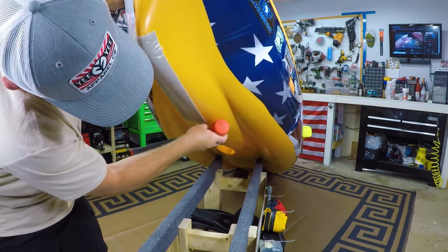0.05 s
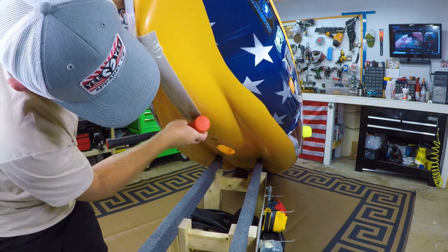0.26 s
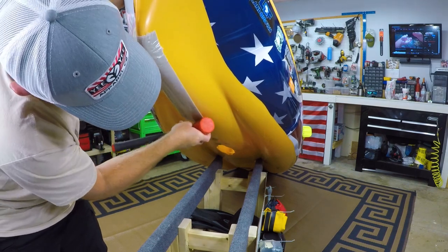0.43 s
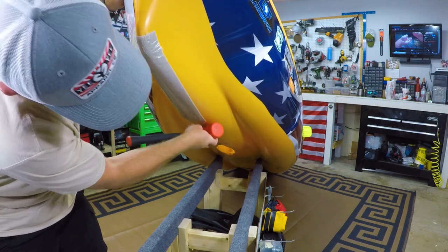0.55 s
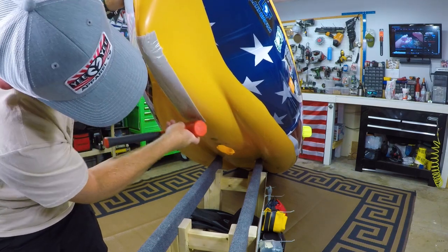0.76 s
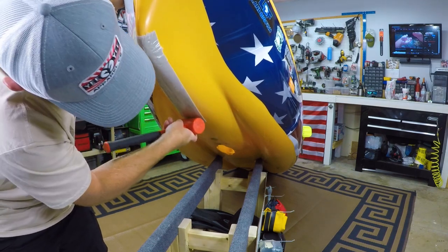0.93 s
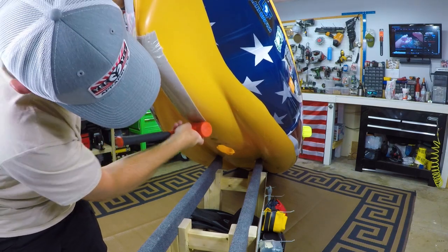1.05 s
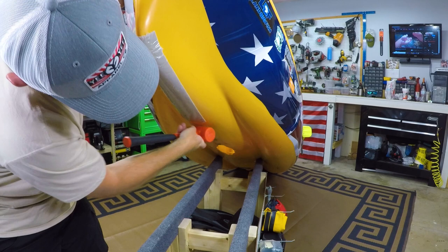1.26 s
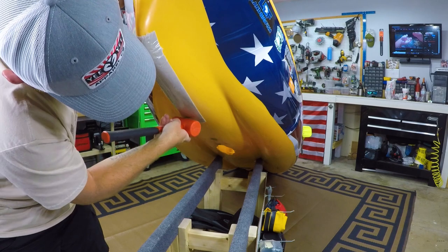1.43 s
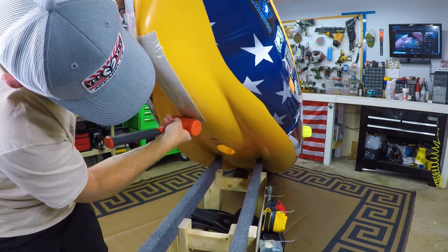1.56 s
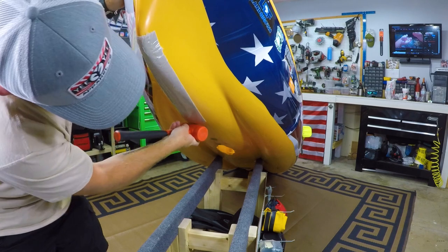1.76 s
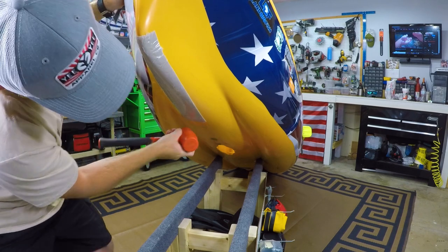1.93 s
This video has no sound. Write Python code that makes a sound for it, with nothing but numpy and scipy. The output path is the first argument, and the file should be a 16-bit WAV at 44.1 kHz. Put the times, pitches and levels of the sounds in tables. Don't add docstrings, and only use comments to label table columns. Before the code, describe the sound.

Mallet knocks on a hollow plastic kayak hull, six hits alternating firm blow and lighter tap, each booming briefly with a dull tail; faint scrapes and hand rubs between, in a garage, close small microphone.

```python
import sys
import numpy as np
from scipy import signal
from scipy.fft import rfft, irfft
from scipy.io import wavfile
from scipy.ndimage import uniform_filter1d

SR = 44100
rng = np.random.default_rng(int(sys.argv[2]) if len(sys.argv) > 2 else 0)


def pcm_store(signal):
    levels = np.round(np.clip(np.atleast_2d(signal), -1, 1) * 32767)
    wavfile.write(sys.argv[1], SR, levels.astype(np.int16).T)


def natural_amplitude(level_db):
    exponent = np.asarray(level_db, float) / 20
    return 10 ** exponent


N = 88200

# f/Hz, level/dB per Hz
HUM_SPECTRUM = [(15, 10), (25, 10.5), (112, 0.5), (237, -8), (451, 1.5), (606, -13), (1150, -15),
                (1510, -16.5), (15100, -28.5)]
# f/Hz, width/Hz, level/dB
HUM_BAND = (460, 67, -79)
# t/s, rise/s, fall/s, level/dB
SHIFTS = [
    (.42, 0.042, 0.075, -54),
    (.97, 0.062, 0.082, -48),
    (1.1, 0.041, 0.062, -50.5),
    (1.18, 0.038, 0.079, -60.5),
    (1.62, 0.028, 0.14, -47),
    (1.74, 0.028, 0.037, -47.5),
]
# f/Hz, level/dB per Hz
SHIFT_SPECTRUM = [(25, -46), (50, 7), (80, 0), (145, -2), (200, -4.5), (300, -7.5), (500, -16),
                  (900, -46.5)]
# t/s, rise/s, fall/s, level/dB
DRAGS = [
    (.25, 0.044, 0.093, -60.5),
    (.4, 0.027, 0.24, -58.5),
    (.93, 0.047, 0.17, -60.5),
    (1.03, 0.034, 0.19, -59.5),
    (1.59, 0.037, 0.13, -61.5),
    (1.68, 0.027, 0.14, -61),
    (1.77, 0.094, .2, -59),
]
# f/Hz, level/dB per Hz
DRAG_SPECTRUM = [(150, -28), (400, 6.5), (700, 0), (1200, -2.5), (2000, -5), (3200, -10.5), (4500, -21),
                 (7000, -25)]
# t/s, rise/s, fall/s, level/dB
RUBS = [
    (.224, 0.0067, 0.059, -59),
    (.42, 0.065, 0.11, -60.5),
    (.8, 0.015, 0.038, -64),
    (1.04, 0.018, 0.14, -65),
    (1.36, 0.0063, 0.023, -100),
    (1.44, 0.03, 0.047, -61.5),
    (1.67, 0.03, 0.058, -63.5),
    (1.785, 0.014, 0.13, -60.5),
    (1.88, 0.078, 0.11, -69.5),
]
# f/Hz, width/Hz, level/dB
RUB_BANDS = [(1850, 2630, 5.5), (3650, 3700, 1.5), (7600, 4000, -1.5), (10400, 2600, -41),
             (13100, 5200, -7.5)]
# t/s, rise/s, fall/s, level/dB
GRIPS = [
    (.44, .06, 0.054, -72),
    (.82, .03, 0.025, -73),
    (1.04, 0.029, 0.067, -69),
    (1.09, 0.041, .03, -69),
    (1.67, 0.032, 0.035, -69.5),
]
TICK_TIMES = [.2232, .2368, .2615, .481, .7955, .812, .827, 1.0454, 1.0457, 1.4316, 1.4513, 1.6798, 1.8898,
              1.8902, 1.942]
# level/dB, f/Hz
TICKS = [(-44.5, 7400), (-38.5, 2130), (-49, 3000), (-50.5, 3400), (-45.5, 2800), (-54, 3500), (-60, 2400),
         (-36, 2220), (-43, 3300), (-44.5, 3340), (-49, 5500), (-46, 2460), (-56, 13500), (-64, 2500),
         (-50, 5730)]
# t/s, peak level/dB, contact time/ms, knock level/dB, boom level/dB
BLOWS = [
    (.2277, -13, 0.14, -12.5, -17),
    (0.4807, -23, 0.16, -20.5, -9.5),
    (.7953, -18.5, 0.11, -10, -7),
    (1.0459, -29, 0.11, -9, -5),
    (1.4329, -20.5, 0.094, -9, -7.5),
    (1.6801, -27, 0.16, -10.5, -5),
]
# delay/s, level/dB
RETURNS = [
    (.0133, -6),
    (.0168, -15),
    (.0265, -14),
]
# f/Hz, level/dB, t60/s
HULL_MODES = [(50.9, -16, 0.4), (72.7, -6, 0.49), (107, 4, 0.29), (151, -20.5, 0.68), (212, -1.5, 0.17),
              (233.3, 5, 0.23), (290, -9, 0.39), (303, 3.5, 0.16), (363, -4.5, 0.18), (404, -61.5, 0.17),
              (533, -35, 0.2)]
# f/Hz, level/dB, t60/s
FIRST_PANEL = [(583, -8, 0.21), (692, -34, 0.066), (740, 6.5, 0.16), (875, 6.5, 0.13), (954, 9, 0.15),
               (1100, -42, 0.045), (1223, 1, 0.14), (1300, -6, 0.12), (1520, 2.5, 0.11), (1810, 10.5, 0.02),
               (1946, -2, .05), (2260, -4, .04)]
# f/Hz, level/dB, t60/s
NEXT_PANEL = [(610, -23, 0.13), (824, 2, 0.12), (935, 7, 0.077), (1041, 14, 0.14), (1350, -13, 0.055),
              (1565, 7, 0.059), (1930, 5.5, 0.029), (2043, 6, 0.053), (2290, 2, 0.038), (2820, -15, 0.018),
              (3250, -15, .015)]
# f/Hz, level/dB per Hz
TAIL_SPECTRUM = [(18, -57), (30, 1.5), (155, -6), (211, -11), (308, -11), (625, -15), (1660, -23),
                 (2890, -28), (6000, -53), (7800, -83), (13200, -120)]
# f/Hz, t60/s
TAIL_T60 = [(50, 0.48), (130, 0.5), (350, 0.63), (920, 0.97), (2400, 0.84), (6000, 0.36)]


def evened(x):
    return x / np.sqrt(np.mean(x ** 2) + 1e-20)


def read(points, hz):
    f, value = np.transpose(points)
    return np.interp(np.log(hz + 1), np.log(f + 1), value)


def add(mix, start_s, sound):
    part = mix[round(start_s * SR):][:len(sound)]
    part += sound[:len(part)]


def coloured(x, spectrum):
    gain = natural_amplitude(read(spectrum, np.fft.rfftfreq(len(x), 1 / SR)))
    return evened(irfft(rfft(x) * gain, len(x)))


def resonate(x, hz, width):
    pole = np.exp((2j * np.pi * hz - np.pi * width) / SR)
    return 2 * signal.lfilter([1 - abs(pole)], [1, -pole], x).real


def band_passed(x, hz, width):
    return resonate(resonate(x, hz, width), hz, width)


def grainy(grain_db, size):
    noise = rng.standard_normal(N)
    flicker = evened(uniform_filter1d(rng.standard_normal(N), size))
    return evened(noise * natural_amplitude(grain_db * flicker))


def strokes(rows):
    linger_s = 0.02
    level = np.zeros(N)
    for start, rise, fall, db in rows:
        up = np.arange(0, rise, 1 / SR) / rise
        down = 1 - np.arange(0, fall, 1 / SR) / fall
        add(level, start, natural_amplitude(db) * np.sin(np.pi / 2 * np.concatenate([up, down])) ** 2)
    pole = np.exp(-1 / (linger_s * SR))
    return np.maximum(level, signal.lfilter([1 - pole], [1, -pole], level))


def garage():
    hum_db, settle_db, settle_t60_s = -61, -55.5, 0.58
    hz, width, band_db = HUM_BAND
    band = natural_amplitude(band_db) * evened(band_passed(rng.standard_normal(N), hz, width))
    fade = natural_amplitude(settle_db - 60 * np.arange(N) / SR / settle_t60_s)
    settle = coloured(rng.standard_normal(N), TAIL_SPECTRUM) * fade
    hum = natural_amplitude(hum_db) * coloured(grainy(0.4, size=1500), HUM_SPECTRUM)
    return hum + band + settle


def shifting():
    return coloured(grainy(2.5, size=600), SHIFT_SPECTRUM) * strokes(SHIFTS)


def dragging():
    return coloured(grainy(0.94, size=300), DRAG_SPECTRUM) * strokes(DRAGS)


def rubbing():
    skin = grainy(1.9, size=150)
    hiss = sum(natural_amplitude(db) * band_passed(skin, hz, width) for hz, width, db in RUB_BANDS)
    return evened(hiss) * strokes(RUBS)


def gripping():
    squeeze = band_passed(grainy(1.8, size=150), hz=7700, width=2600)
    return evened(squeeze) * strokes(GRIPS)


def tick(db, hz):
    peak_turns = 0.8
    turns = np.arange(300) / SR * hz
    swell = turns / peak_turns * np.exp(1 - turns / peak_turns)
    return natural_amplitude(db) * np.sin(2 * np.pi * turns) * swell


def rung(modes, t):
    spot_db, spot_detune, most_cycles = 3.5, 0.006, 60
    spot = rng.standard_normal((len(modes), 2))
    ring = np.zeros(len(t))
    for (hz, db, t60), (weight, detune) in zip(modes, spot):
        decay_s = min(t60, most_cycles / hz)
        level = natural_amplitude(db + spot_db * weight - 60 * t / decay_s)
        ring += level * np.sin(2 * np.pi * hz * (1 + spot_detune * detune) * t)
    return ring


def bending_wave(t):
    lead_s, peak_s = 0.0003, 0.0052
    sweep_s, sweep_ratio = 0.0011, 1.74
    u = t / peak_s
    swell = u ** 0.19 * np.exp(0.5 - u ** 2 / 2)
    wave = -np.cos(np.pi * np.log((t + lead_s) / sweep_s) / np.log(sweep_ratio)) * swell
    wave *= np.minimum(t / lead_s, 1) ** 2
    front = wave.copy()
    for delay_s, db in RETURNS:
        add(front, delay_s, natural_amplitude(db) * wave)
    return front


def diffuse_tail(t):
    noise = coloured(rng.standard_normal(len(t)), TAIL_SPECTRUM)
    hz, frames, z = signal.stft(noise, SR, nperseg=512)
    fade = natural_amplitude(-60 * frames / read(TAIL_T60, hz)[:, None])
    return signal.istft(z * fade, SR, nperseg=512)[1][:len(t)]


def blow(start, db, contact_ms, knock_db, boom_db):
    t = np.arange(round(0.7 * SR)) / SR
    boom_hz, boom_t60_s = 135.8, 0.34
    ring_db, ring_rise_s = -13, 0.003
    tail_rise_s, panel_rise_s, move_s = 0.007, 0.003, 1.0
    tail_db = -14.5 + 0.14 * (db + 25.5)

    front = bending_wave(t)
    tail = diffuse_tail(t)
    boom = natural_amplitude(boom_db - 60 * t / boom_t60_s) * np.sin(2 * np.pi * boom_hz * t)
    ring = natural_amplitude(ring_db) * rung(HULL_MODES, t)
    body = front - (boom + ring) * (1 - np.exp(-(t / ring_rise_s) ** 2))
    body += natural_amplitude(tail_db) * tail * (1 - np.exp(-(t / tail_rise_s) ** 2))
    pole = np.exp(-1000 / (contact_ms * SR))
    body = signal.lfilter([(1 - pole) ** 3], np.poly([pole] * 3), body)

    panel = FIRST_PANEL if start < move_s else NEXT_PANEL
    knock = natural_amplitude(knock_db - 14) * rung(panel, t) * (1 - np.exp(-t / panel_rise_s))
    return natural_amplitude(db - 2.5) * (body + knock)


def scene():
    mix = garage() + shifting() + dragging() + rubbing() + gripping()
    for start, (db, hz) in zip(TICK_TIMES, TICKS):
        add(mix, start, tick(db, hz))
    for row in BLOWS:
        add(mix, row[0], blow(*row))
    return mix[None]


def band_limit(x):
    return signal.sosfilt(signal.butter(12, 15240, fs=SR, output="sos"), x)


def record(dry):
    low_cut = signal.butter(2, 40.7, "high", fs=SR, output="sos")
    thin = signal.sosfilt(low_cut, dry)
    return band_limit(thin)


dry = scene()
out = record(dry)
pcm_store(out)
```